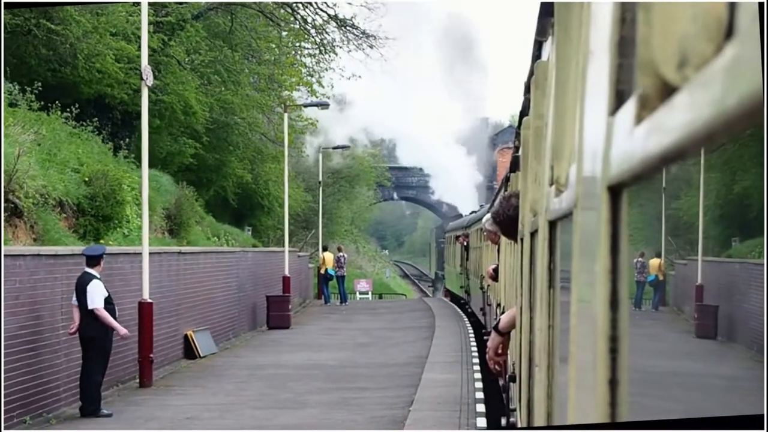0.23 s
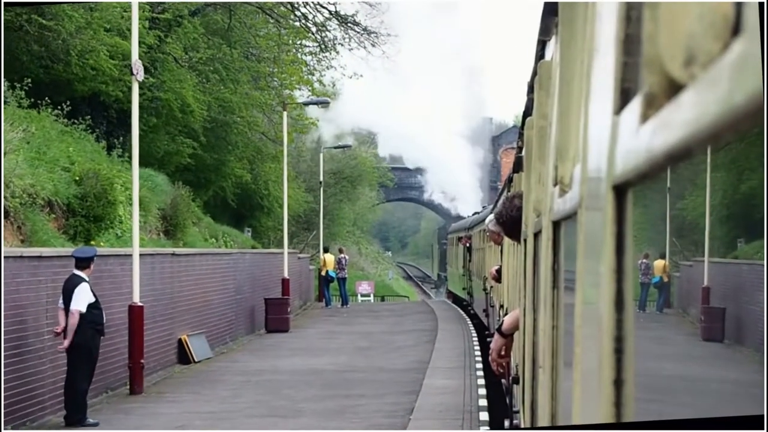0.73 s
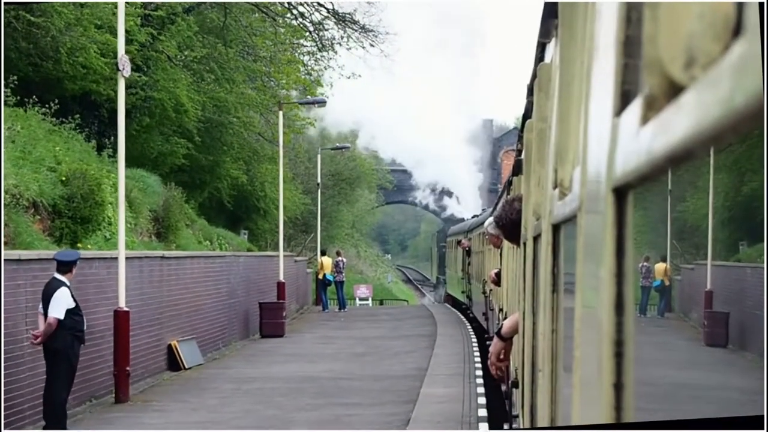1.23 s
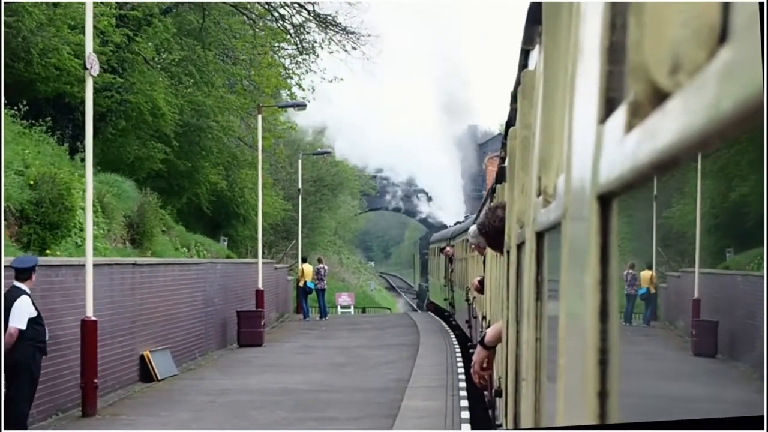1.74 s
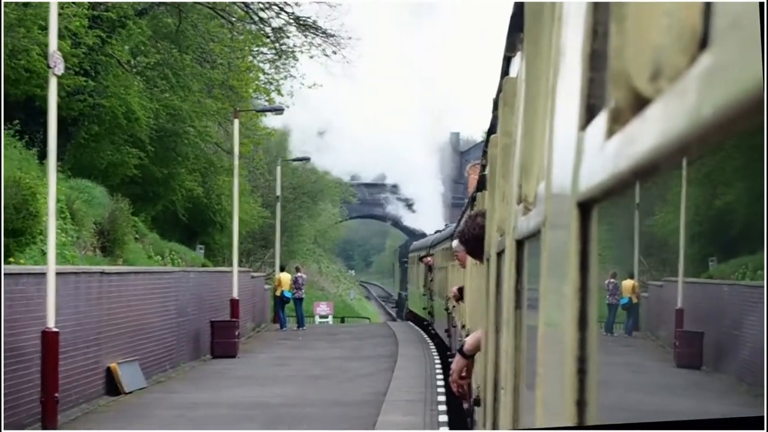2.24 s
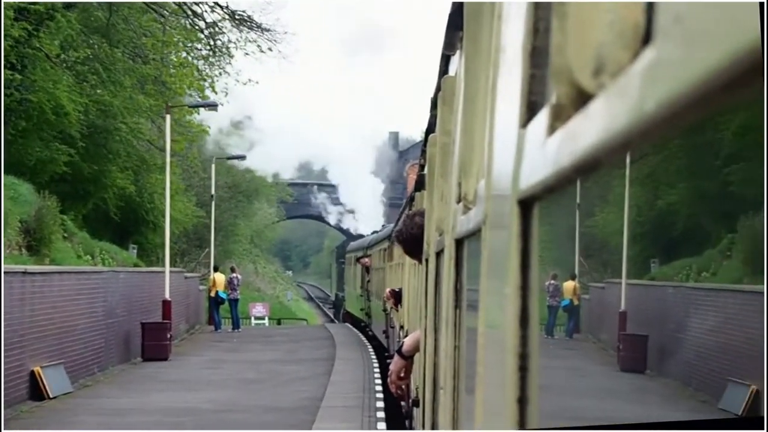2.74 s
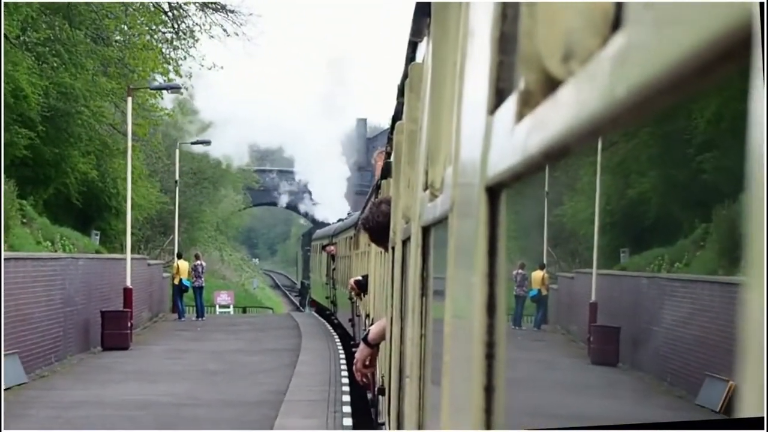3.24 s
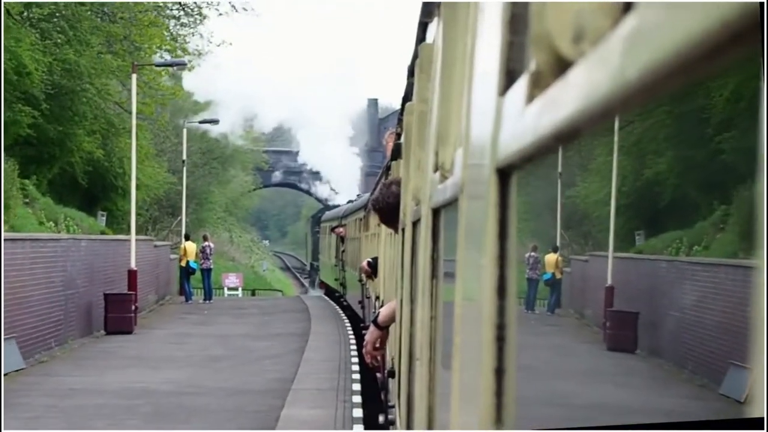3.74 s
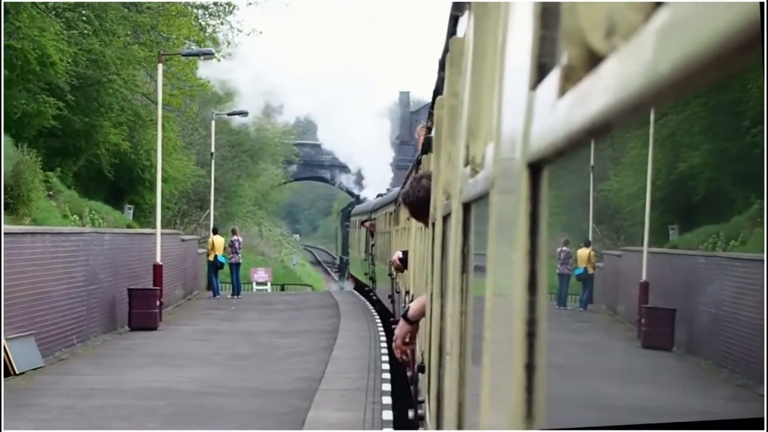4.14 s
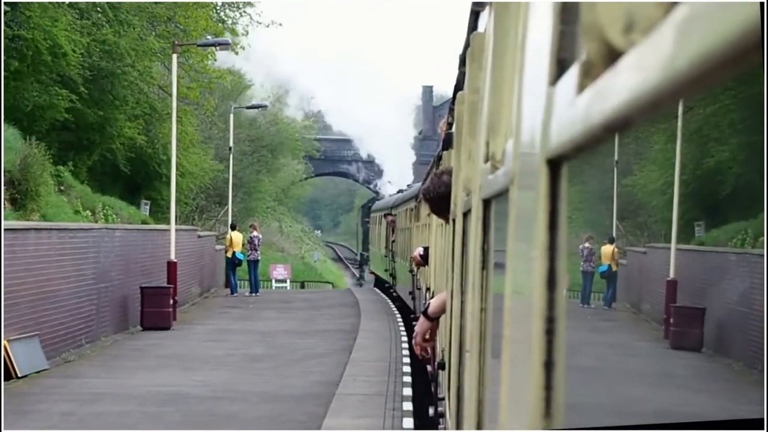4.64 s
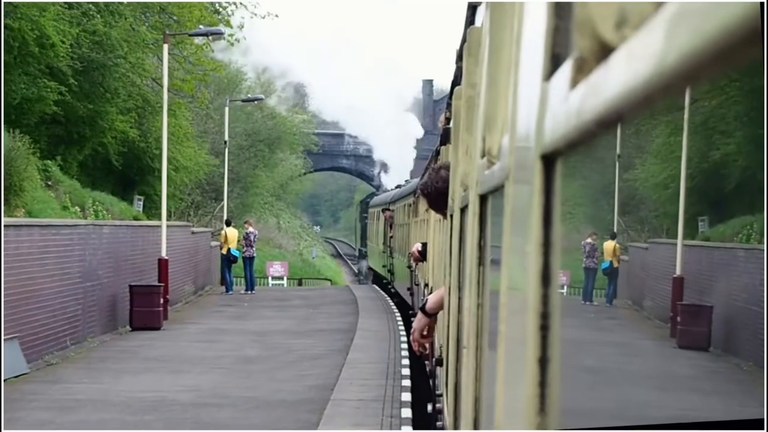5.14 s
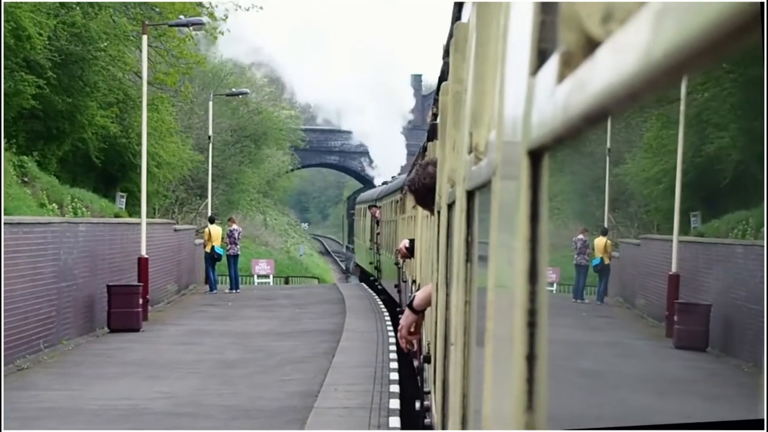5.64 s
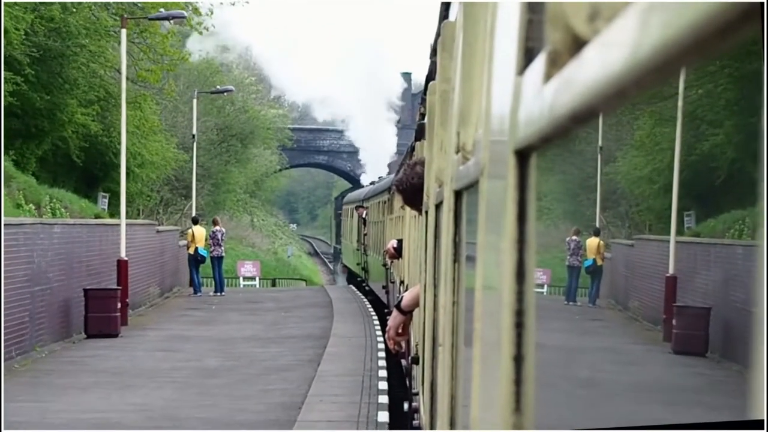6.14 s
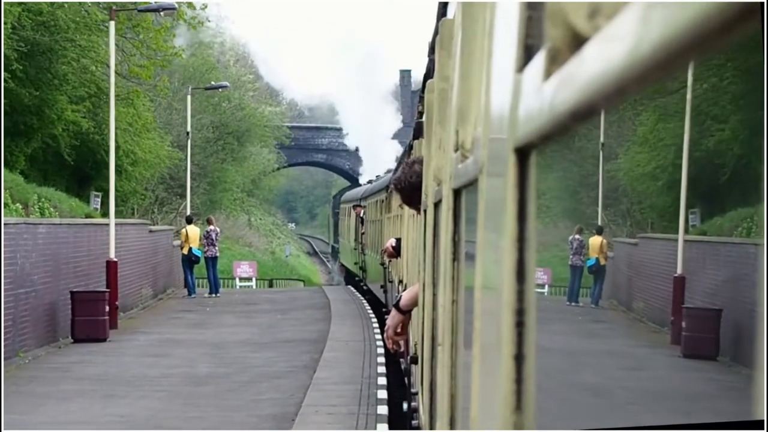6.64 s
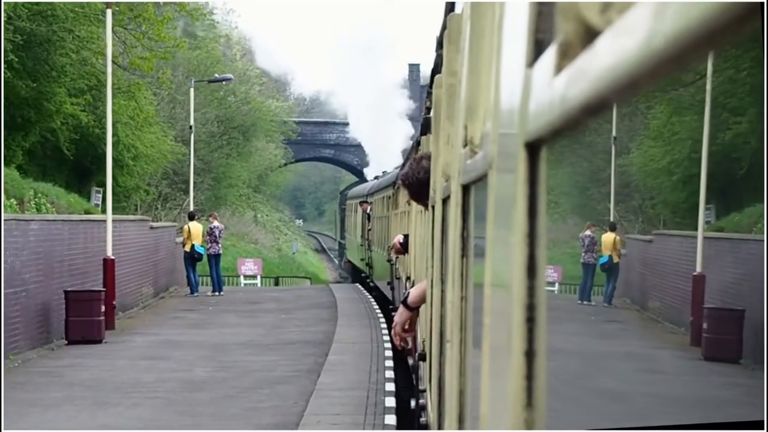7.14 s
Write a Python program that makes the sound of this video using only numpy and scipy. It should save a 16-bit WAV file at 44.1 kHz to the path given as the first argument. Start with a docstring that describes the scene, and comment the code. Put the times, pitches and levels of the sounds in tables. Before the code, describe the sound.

Heard from a carriage window, a steam engine chuffs away ahead, beats slowly speeding up, with constant hissing, iron clanks and a whistle's fading tail.

```python
"""At a railway station, a steam locomotive draws its train out, heard from a carriage window some way back.
Each exhaust beat booms and barks in the chimney with a rush of steam on top: shaped noise plus two ringing notes.
Leaking steam hisses throughout, wheels and carriage rumble softly, and the last of a whistle dies away.
Couplings and running gear clank and rattle: ringing iron with bursts of rough noise.
The wooded cutting returns a short tail to the exhaust and the ironwork."""
import sys
import numpy as np
from scipy import signal
from scipy.fft import rfft, irfft
from scipy.io import wavfile
from scipy.ndimage import uniform_filter1d, map_coordinates

SR = 44100
rng = np.random.default_rng(int(sys.argv[2]) if len(sys.argv) > 2 else 0)


def dump_mix(stems):
    """Bounce the given channels to the path in sys.argv[1] as a 16-bit WAV at rate SR."""
    frames = np.atleast_2d(stems).T  # one column per channel
    limited = np.clip(frames, -1, 1)  # hard clip at full scale
    pcm = np.round(limited * 32767).astype(np.int16)
    wavfile.write(sys.argv[1], SR, pcm)


N = 325899
T = np.arange(N) / SR  # time of each sample, s
HZ = np.maximum(np.fft.rfftfreq(N, 1 / SR), 1)  # frequencies of the whole sound's spectrum


def undb(db):
    """Turn decibels into gain."""
    return 10 ** (np.asarray(db) / 20)


def unit(x):
    """Scale to an rms strength of 1."""
    return x / np.sqrt(np.mean(x ** 2))


def curve(rows):
    """Join rows (t/s, value) by straight lines over time."""
    return np.interp(T, *np.transpose(rows))


def across(points):
    """Join rows (f/Hz, value) by straight lines on a log-frequency axis."""
    hz, value = np.transpose(points)
    return np.interp(np.log(HZ), np.log(hz), value)


def around(hz, pitch_hz, spread):
    """Gain of a bell-shaped band; spread is its standard deviation in octaves."""
    return np.exp(-(np.log2(hz / pitch_hz) / spread) ** 2 / 2)


def resonances(modes):
    """Gain over frequency of a set of steep-sided resonances, their powers added."""
    power = 0
    for hz, width, db in modes:
        off_tune = (HZ / hz - hz / HZ) * hz / width
        power = power + undb(db) ** 2 / (1 + off_tune ** 2 / 2) ** 2
    return np.sqrt(power)


def walk(rate, size=N):
    """Slow chance: random levels held 1 / rate s and smoothed twice."""
    step = max(int(SR / rate), 1)
    steps = np.repeat(rng.standard_normal(size // step + 1), step)[:size]
    return unit(uniform_filter1d(uniform_filter1d(steps, step), step))


# how alike left and right are when diffuse is 1: f/Hz, coherence (0-1)
LEFT_RIGHT_LIKENESS = [(60, 0.9), (200, 0.99), (800, 0.91), (1300, 0.74), (1650, 0.27), (2250, 0.18),
                       (2600, 0.38), (3400, 0.52), (4100, 0.05), (4850, 0.52), (6700, 0.16), (8000, 0),
                       (14000, 0.07)]


def turbulence(gain, diffuse=1):
    """Rushing stereo noise of a given colour; the more diffuse, the less alike left and right."""
    apart = np.clip(1 - across(LEFT_RIGHT_LIKENESS), 0, 1)
    apart = np.clip(apart * diffuse / (1 - apart + apart * diffuse), 0, 1)
    noise = rfft(rng.standard_normal((3, N)))
    own, shared = noise[:2], noise[2]
    return unit(irfft(gain * (np.sqrt(1 - apart) * shared + np.sqrt(apart) * own), N))


def held(x, span_s):
    """Even out the strength of a noise over spans of this length; its faster flutter stays."""
    return x / np.sqrt(uniform_filter1d(np.mean(x ** 2, axis=0), int(span_s * SR)))


def shelf(x, hz, db):
    """Raise or lower what lies above a corner frequency; db may move in time."""
    treble = irfft(rfft(x) / (1 + (hz / HZ) ** 6), N)
    return x + treble * (undb(db) - 1)


def add(out, at, sound):
    """Mix a sound in at a time in seconds."""
    start = int(at * SR)
    out[start:start + len(sound)] += sound[:N - start]


def with_band(x, spectrum, hz, octaves, db):
    """Move the level of one band of a sound, leaving the rest alone."""
    return x + irfft(spectrum * around(HZ, hz, octaves), N) * (undb(db) - 1)


# colour of the leaking steam: f/Hz, relative level/dB
HISS_COLOUR = [(900, -21.5), (1450, -16), (1800, -5), (2250, -7), (2800, -0.5), (3400, 1.25), (3800, 2),
               (4200, -0.5), (5000, 2), (5500, -3), (6150, -3.5), (6850, -8), (7400, -6), (8300, -5.6),
               (9300, -10.6), (9900, -8.5), (10500, -11.5), (11500, -9.5), (12900, -16.5), (14200, -15),
               (15300, -28)]
# rise and fall of the middle of the hiss: t/s, level change/dB
HISS_MIDDLE = [(0, 1.5), (1.5, -.5), (2.9, -0.5), (3.6, .5), (4.7, -.7), (5.3, -0.5), (5.85, 1.5),
               (6.25, 0), (6.6, 0.5), (7.39, -2)]
# rise and fall of the lower edge of the hiss: t/s, level change/dB
HISS_LOWER_EDGE = [(0, 1.5), (2.3, 0), (3.6, 0), (4.4, -2), (6.3, -3.5), (7.39, 1)]
# course of the whole leak, before leak_db is added: t/s, level/dB
LEAK_COURSE = [(0.0, -49.5), (1.13, -48.5), (1.48, -50.5), (2.0, -50), (2.34, -50.5), (2.68, -51),
               (2.84, -49), (3.38, -49), (4.4, -51.5), (5.0, -50.5), (5.89, -48.5), (6.73, -52),
               (7.39, -51)]


def leak(leak_db=3.0, sputter_db=0.42, drift_db=0.5, flicker_db=0.87):
    """Steam escapes steadily, with a slight sputter; moving air lets bands of it swell and fade."""
    hiss = turbulence(undb(across(HISS_COLOUR)))
    spectrum = rfft(hiss)
    hiss = with_band(hiss, spectrum, hz=5400, octaves=0.32, db=curve(HISS_MIDDLE))
    hiss = with_band(hiss, spectrum, hz=2100, octaves=0.19, db=curve(HISS_LOWER_EDGE))
    for hz in (3340, 5200, 11000):
        wander_db = drift_db * walk(2.36) + flicker_db * walk(14)
        hiss = with_band(hiss, spectrum, hz, octaves=0.22, db=wander_db)
    return hiss * undb(curve(LEAK_COURSE) + leak_db + sputter_db * walk(180))


# drift of the highest treble from the engine: t/s, level change/dB
ENGINE_TREBLE = [(0, 2), (1.3, -1.5), (2.2, -1.5), (3.3, 0.5), (4.3, 0.5), (5.6, 1), (6.4, 0.5),
                 (7.39, 2.5)]


def shaded(x):
    """Sound from the engine bends round the carriages, and its highest treble drifts."""
    return shelf(x, hz=6100, db=curve(ENGINE_TREBLE))


START_SPEED, GATHER_S = 0.63, 6.4  # share of full speed at the start; time constant of gathering the rest


def speed(t):
    """The train gathers way: its share of full speed, closing in on 1 ever more slowly."""
    return 1 - (1 - START_SPEED) * np.exp(-t / GATHER_S)


def stroke(t, rise, decay, hold=0, crest_s=0.013):
    """A push swells, holds at a rounded crest and dies away, as when a valve opens and a cylinder empties."""
    opening = (np.minimum(t + hold / 2, 0) / rise) ** 2 / 2
    emptying = (np.hypot(np.maximum(t - hold / 2, 0), crest_s) - crest_s) / decay
    return np.exp(-opening - emptying)


ROLL_DB, ROLL_LAW = -53, 0.76  # wheel roar at full speed, dB; power of the speed its amplitude follows
RUMBLE_DB, RUMBLE_LAW = -64, 2.4  # the same for the carriage body
TUG_RISE_S, TUG_ROAR_S, TUG_RUMBLE_S = 0.085, 0.18, 0.085  # swell of a tug; decays of roar and rumble
# colour of wheels rolling on the rails: f/Hz, relative level/dB
WHEEL_COLOUR = [(100, -13.5), (190, -2), (250, -5), (330, -6.5), (500, -3), (780, 0), (1220, 1.5),
                (1450, -4), (1850, -4), (3000, -21.5), (9000, -28)]
# colour of the carriage body's rumble: f/Hz, relative level/dB
BODY_COLOUR = [(20, -30), (35, -24), (54, 4), (76, -3.5), (110, 1.5), (160, -10.5), (300, -9.5), (700, -42)]
# tugs of the couplings that shake the carriage: crest t/s, wheel roar level/dB, body rumble level/dB
COUPLING_TUGS = [(1.09, -49.5, -50.5), (1.86, -59, -72), (3.2, -55.5, -66), (3.98, -72, -67),
                 (7.15, -69, -60)]


def carriage(uneven_db=0.38):
    """Wheels roar softly on uneven rail and the body rumbles: more with speed, and when couplings tug."""
    roar = undb(ROLL_DB) * speed(T) ** ROLL_LAW
    rumble = undb(RUMBLE_DB) * speed(T) ** RUMBLE_LAW
    for at, roar_db, rumble_db in COUPLING_TUGS:
        roar = np.hypot(roar, undb(roar_db) * stroke(T - at, TUG_RISE_S, TUG_ROAR_S))
        rumble = np.hypot(rumble, undb(rumble_db) * stroke(T - at, TUG_RISE_S, TUG_RUMBLE_S))
    wheels = turbulence(undb(across(WHEEL_COLOUR)), diffuse=1.02) * roar * undb(uneven_db * walk(22))
    body = turbulence(undb(across(BODY_COLOUR))) * rumble
    return wheels + body


# notes left of the whistle: f/Hz, width/Hz, relative level/dB
WHISTLE_NOTES = [(747, 14, -6), (790, 15, -5), (1570, 9.5, -4)]


def whistle_echo(db=-54.5, t60=1.6):
    """The last of a whistle dies away along the cutting: narrow bands of noise, losing 60 dB in t60 s."""
    return held(turbulence(resonances(WHISTLE_NOTES)), span_s=0.053) * undb(db - 60 * T / t60)


def eddies(x, centres_hz, depth_db, rate, octaves=0.13):
    """Eddies of different sizes make each of these bands of a jet flutter on its own."""
    spectrum = rfft(x)
    for hz in centres_hz:
        x = with_band(x, spectrum, hz, octaves, depth_db * walk(rate))
    return unit(x)


def retuned(x, ratio):
    """Shift all resonances of a noise by playing it faster or slower; the ratio moves in time."""
    return np.array([map_coordinates(side, [np.cumsum(ratio)], order=1, mode="mirror") for side in x])


BEAT_LEAD_S = 0.25  # each beat is played from this long before its crest
DECAY_S, DECAY_LAW = 0.039, 0.41  # decay of the bark at full speed; power of the speed that shortens it
# the chimney drones softly around one beat
DRONE_AT_S, DRONE_DB, DRONE_RISE_S, DRONE_DECAY_S = 5.28, -58.5, 0.083, 0.093
# exhaust beats: crest t/s, bark level/dB, steam jet level/dB, boom level/dB, hardness (treble of the bark)/dB,
# rise of bark and jet/s, hold/s, lead of jet/s, lead of boom/s, boom f/Hz,
# first ringing note f/Hz, its level/dB, second ringing note f/Hz, its level/dB
EXHAUST_BEATS = [(0.412, -44, -42.5, -43, 5.5, 0.025, .021, 0.0017, -0.00016, 181, 1205, -42.5, 805, -47),
                 (1.245, -40.5, -39, -41.5, 5.5, 0.013, 0.03, 0.0017, 0.0052, 190.6, 1222, -41, 766, -46),
                 (2.011, -44.5, -40, -44, 4.5, 0.036, .0064, 0.0077, 0.00098, 193.8, 819, -44.5, 1180, -53),
                 (2.733, -42.5, -42.5, -46.5, 4.5, 0.026, 0.037, 0.0092, -0.004, 202.4, 938, -56, 837, -50),
                 (3.431, -47, -42, -46, 6, 0.026, 0.013, .008, 0.0064, 203.8, 950, -48, 867, -52),
                 (4.09, -42.5, -42, -43.5, 6, .022, .02, -0.0023, 0.0042, 197.9, 1090, -59, 797, -50),
                 (4.7, -44, -44, -45.5, -1, 0.029, .012, -0.00015, -0.0011, 197.1, 1233, -47.5, 478, -52.5),
                 (5.294, -43.5, -44, -47.5, 0.5, 0.019, 0.023, -0.0079, -0.003, 192.8, 630, -51, 968, -52),
                 (5.901, -44, -44.5, -47.5, -2, 0.028, .01, -0.0029, -0.0019, 203, 791, -50, 993, -56),
                 (6.488, -43.5, -43, -45.5, 0.5, 0.019, 0.019, -0.0012, -0.0023, 188, 652, -49.5, 370, -57),
                 (7.03, -46, -45, -47.5, 3, 0.021, .01, -0.0047, -0.0023, 186, 848, -50, 629, -51)]
# lowest resonances of chimney and smokebox, before each beat retunes them: f/Hz, width/Hz, relative level/dB
BOOM_RESONANCES = [(191, 28, 5.5), (238, 18.5, 2), (323, 120, -10.5)]
# upper resonances of the chimney: f/Hz, width/Hz, relative level/dB
BARK_RESONANCES = [(307, 34, -3.5), (370, 76, -4.5), (476, 24, 0.5), (560, 54, -2), (626, 60, 3),
                   (698, 57, -0.5), (799, 40, 5), (875, 54, 1), (994, 74, 0), (1108, 65, -0.5),
                   (1212, 35, 0.5), (1316, 80, -6), (1840, 220, -10)]
# colour of the steam jet at the blast pipe: f/Hz, relative level/dB
JET_COLOUR = [(300, -39), (1000, -29), (1500, 2), (1850, -7.5), (2150, 4), (2450, 4.5), (2800, 7.5),
              (3400, 9), (4200, 2.5), (5000, 3), (6500, -8), (8200, -5.5), (11500, -12.5), (15000, -19)]


def exhaust(boom_rise=0.89, boom_decay=0.65, waver=0.0204):
    """Each cylinder stroke blows an eddying jet up the chimney and sounds its resonances, with two notes on top."""
    boom, bark, jet, notes = np.zeros((4, N))
    t = T[:SR] - BEAT_LEAD_S
    for (at, bark_db, jet_db, boom_db, _, rise, hold, jet_lead, boom_lead, _,
         first_hz, first_db, second_hz, second_db) in EXHAUST_BEATS:
        start = at - BEAT_LEAD_S
        decay = DECAY_S / speed(at) ** DECAY_LAW
        blast = stroke(t, rise, decay, hold)
        add(bark, start, undb(bark_db) * blast)
        add(jet, start, undb(jet_db) * stroke(t + jet_lead, rise, decay, hold))
        # the deep resonances speak only while the blast is strong
        boom_stroke = stroke(t + boom_lead, rise * boom_rise, decay * boom_decay, hold)
        add(boom, start, undb(boom_db) * boom_stroke)
        for hz, db in (first_hz, first_db), (second_hz, second_db):
            # the pitch wavers by the share `waver`
            unsteady_s = t + waver * np.cumsum(walk(90.4, size=SR)) / SR
            note = np.sin(2 * np.pi * (hz * unsteady_s + rng.random()))
            add(notes, start, undb(db) * blast * note)
    drone = undb(DRONE_DB) * stroke(T - DRONE_AT_S, DRONE_RISE_S, DRONE_DECAY_S)
    boom = np.hypot(boom, drone)

    columns = np.transpose(EXHAUST_BEATS)
    crest_s, hard_db, boom_hz = columns[0], columns[4], columns[9]
    chimney = held(turbulence(resonances(BARK_RESONANCES), diffuse=0.19), span_s=0.042)
    # the first, hardest beats drive the upper resonances most
    chimney = shelf(chimney, hz=1060, db=np.interp(T, crest_s, hard_db))
    chimney = eddies(chimney, (600, 1110), depth_db=2.0, rate=70)
    smokebox = turbulence(resonances(BOOM_RESONANCES), diffuse=0.014)
    smokebox = retuned(smokebox, np.interp(T, crest_s, boom_hz) / BOOM_RESONANCES[0][0])
    # the boom is uneven within a beat
    smokebox = held(smokebox, span_s=0.042) * undb(1.5 * walk(60))
    steam = turbulence(undb(across(JET_COLOUR)), diffuse=0.36)
    steam = eddies(steam, (2670, 3840), depth_db=2.6, rate=90)
    return bark * chimney + notes + jet * steam + boom * smokebox


def cutting(x, t60, wet_db, dull_hz, thin_hz, build_s):
    """Scatter from platform wall, carriages and trees builds up, then fades, with less bass and treble."""
    colour = 1 / np.hypot(1, HZ / dull_hz) / np.hypot(1, thin_hz / HZ)
    tail = turbulence(colour) * (1 - np.exp(-T / build_s)) * undb(-60 * T / t60)
    tail = tail[:, :SR] / np.sqrt(np.sum(tail ** 2) / 2)
    return x + undb(wet_db) * signal.fftconvolve(x, tail, axes=1)[:, :N]


# what the ironwork rings with, before each blow detunes it: f/Hz, relative level/dB, time to fall 60 dB/s
IRON_MODES = [(332, 0, .03), (470, 7, 0.028), (644, -9, 0.063), (784, -2, 0.052), (890, 1, 0.029),
              (996, -3, 0.035), (1124, 10, 0.031), (1330, 1, 0.064), (1480, -7, 0.031), (1630, -6, 0.033),
              (1900, -9, 0.056), (2520, -5, 0.032), (2770, -1, 0.019)]


def ring(pitch_hz, spread, contact_s=0.003):
    """A blow rings the modes of the ironwork that lie near its pitch."""
    t = T[:SR // 3]
    hz, db, t60 = np.transpose(IRON_MODES)[:, :, None]
    weight = undb(db) * around(hz, pitch_hz, spread)
    detune = np.exp(0.014 * rng.standard_normal(hz.shape))
    # each mode arrives by its own path, so they do not start in step
    swing = np.sin(2 * np.pi * (hz * detune * t + rng.random(hz.shape)))
    modes = np.sum(weight * undb(-60 * t / t60) * swing, axis=0) / np.linalg.norm(weight)
    # the parts press together over a moment (contact_s at 1 kHz); small, high ones strike more sharply
    return modes * (1 - np.exp(-(t / contact_s) ** 2 * pitch_hz / 1000))


def crunch(pitch_hz, spread, decay, swell_cycles=1.7, grain=0.55):
    """Many small contacts of loose links and plates merge into a rough burst; deep ones swell more slowly."""
    t = T[:SR // 3]
    hz = np.maximum(np.fft.rfftfreq(len(t), 1 / SR), 1)
    contacts = rng.standard_normal(len(t)) * np.exp(grain * rng.standard_normal(len(t)))
    envelope = (1 - np.exp(-(t * pitch_hz / swell_cycles) ** 2)) * np.exp(-t / decay)
    burst = envelope * irfft(rfft(contacts) * around(hz, pitch_hz, spread) / np.sqrt(hz), len(t))
    return burst * np.linalg.norm(envelope) / np.linalg.norm(burst)


# clanks of couplings and running gear: t/s, ring level/dB, crunch level/dB,
# f/Hz where the blow is strongest, spread/octaves, decay time constant of the crunch/s
IRON_CLANKS = [(.888, -39, -49, 1050, .5, .035), (.917, -44, -46, 1000, .6, 0.013),
               (.923, -19.5, -45, 440, 0.62, .01), (.924, -31, -42, 1400, 0.33, .012),
               (.926, -52, -44, 151, 0.84, 0.02), (.941, -36, -43, 1420, 0.28, 0.019),
               (.943, -39, -46, 620, 0.78, 0.038), (.967, -35, -40, 1080, 0.64, 0.032),
               (1.753, -54, -52, 550, 1.5, .022), (1.772, -54, -55, 220, 0.65, 0.028),
               (1.784, -35.5, -46.5, 730, 0.67, 0.018), (1.86, -43, -47, 850, 0.23, 0.011),
               (2.71, -38, -52, 2700, 0.16, .007), (2.746, -29, -41, 614, 0.65, .02),
               (2.745, -37, -48.5, 1670, 0.2, 0.051), (3.087, -44, -50, 215, 0.97, .03),
               (3.108, -33, -51, 2600, 0.13, 0.0067), (3.118, -36, -54, 1640, 0.089, .005),
               (3.12, -38, -46.5, 970, 0.45, 0.03), (3.144, -44, -57, 1660, .12, .01),
               (3.194, -40, -51, 756, 0.73, 0.043), (3.249, -40, -50, 1150, 0.14, 0.01),
               (3.958, -48, -52, 620, 0.75, 0.042), (3.978, -50, -47.5, 1620, 0.63, 0.026),
               (3.985, -28.5, -37.5, 440, 0.7, .014), (4.005, -45, -44.5, 990, 0.69, 0.036),
               (5.245, -37, -49, 735, 0.28, .025)]


def clanks():
    """Iron strikes iron: a short dead ring and the crunch of loose parts."""
    out = np.zeros(N)
    for at, ring_db, crunch_db, pitch_hz, spread, decay in IRON_CLANKS:
        add(out, at, undb(ring_db) * ring(pitch_hz, spread))
        add(out, at, undb(crunch_db) * crunch(pitch_hz, spread, decay))
    return np.array([out, out])


# rattles of loose links: start t/s, length/s, level/dB before fall and scatter, middle f/Hz of the knocks
LINK_RATTLES = [(.98, .19, -39.5, 960), (3.128, .16, -40, 990)]


def rattles(count=9, falls_db=6, scatter_db=3.0, scatter_octaves=0.26, spread=0.16):
    """After a tug, loose links knock on at uneven gaps, each with its own pitch."""
    out = np.zeros(N)
    for at, length, db, pitch_hz in LINK_RATTLES:
        for k, (size, colour) in enumerate(rng.standard_normal((count, 2))):
            gone = (k + rng.random()) / count  # share of the rattle that is over
            knock = ring(pitch_hz * 2 ** (scatter_octaves * colour), spread)
            knock_db = db - falls_db * gone + scatter_db * size
            add(out, at + gone * length, undb(knock_db) * knock)
    return out


def scene():
    """The engine far ahead, the ironwork nearer, over hiss, rolling and the end of a whistle."""
    engine = cutting(exhaust(), t60=1.3, wet_db=-15.5, dull_hz=5300, thin_hz=493, build_s=0.019)
    ironwork = cutting(clanks() + rattles(), t60=0.35, wet_db=-10, dull_hz=3000, thin_hz=150, build_s=0.0013)
    return shaded(engine + leak()) + ironwork + carriage() + whistle_echo()


LAG_S, TOP_HZ = 1.6e-5, 15100  # delay of the right side; where the treble is cut off
# difference in colour between the two sides: f/Hz, left minus right level/dB
LEFT_MINUS_RIGHT = [(100, -1.1), (550, -0.5), (1400, 1), (1900, -4), (2300, -8), (3100, -5), (3800, -4),
                    (4300, -7), (4900, -2.5), (5700, -1), (6900, -6), (8300, 6), (9300, -3), (11000, 3),
                    (14000, -0.5)]


def record(dry):
    """The two microphone ports colour the sound differently, the right hears it a little late, the top is cut."""
    tilt = undb(across(LEFT_MINUS_RIGHT))
    delay = np.exp(-2j * np.pi * HZ * LAG_S)
    # the shared factor keeps the power of both sides together
    ports = np.array([tilt, delay]) * np.sqrt(2 / (1 + tilt ** 2))
    top_cut = signal.ellip(10, 0.2, 80, TOP_HZ, fs=SR, output="sos")
    return signal.sosfilt(top_cut, irfft(rfft(dry) * ports, N))


dry = scene()
out = record(dry)
dump_mix(out)
```